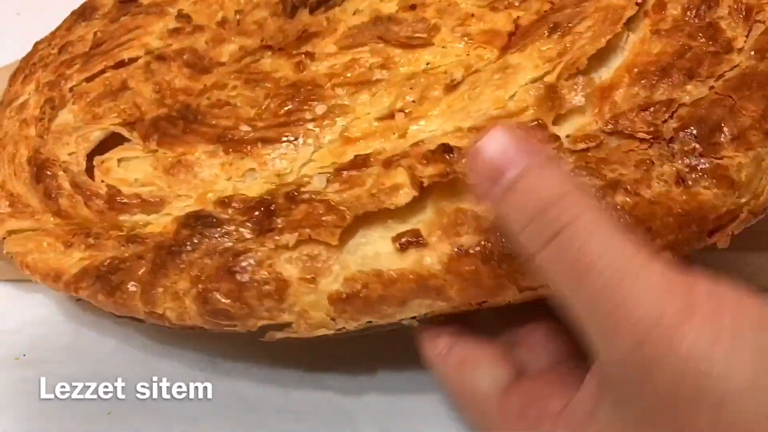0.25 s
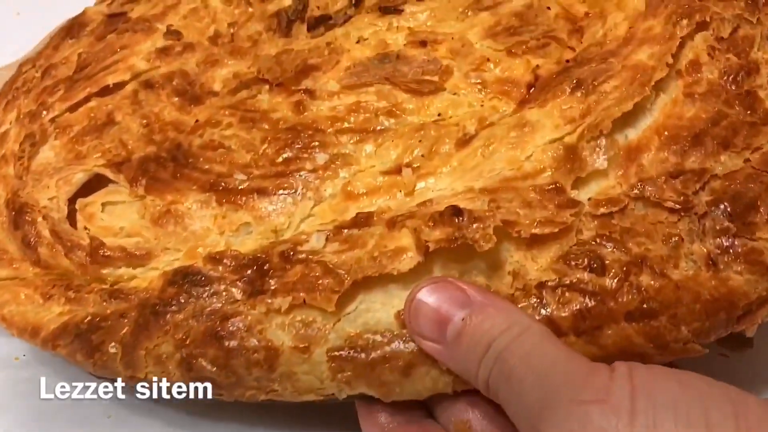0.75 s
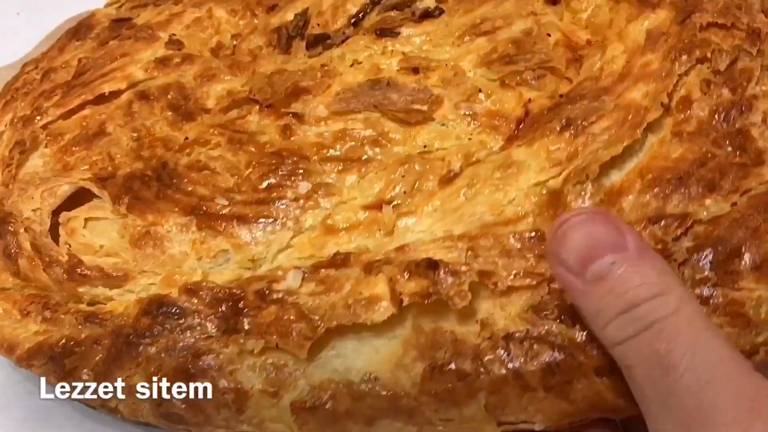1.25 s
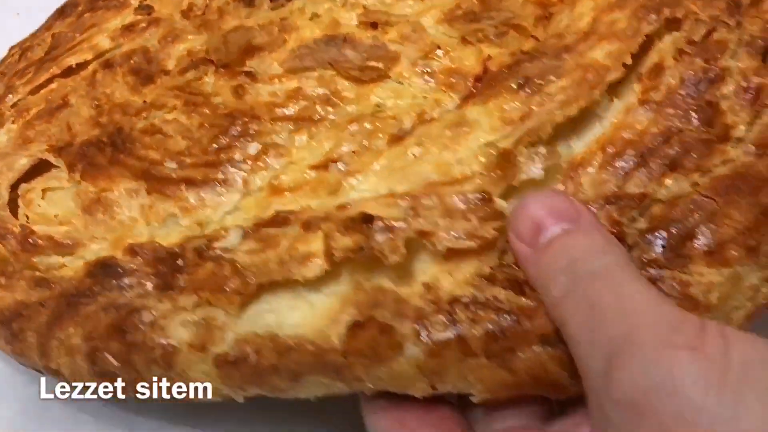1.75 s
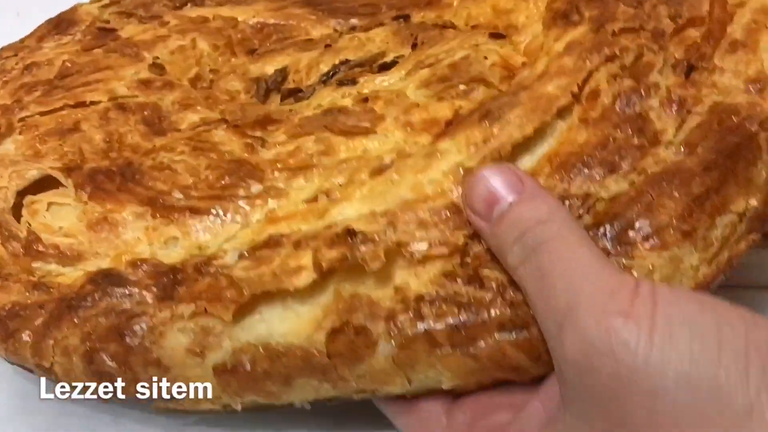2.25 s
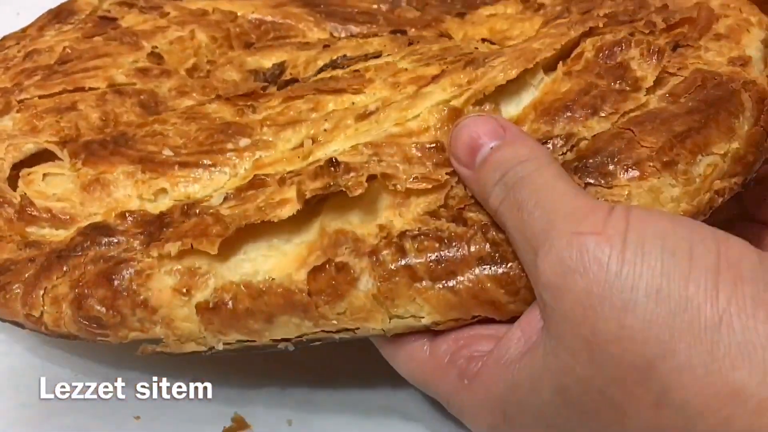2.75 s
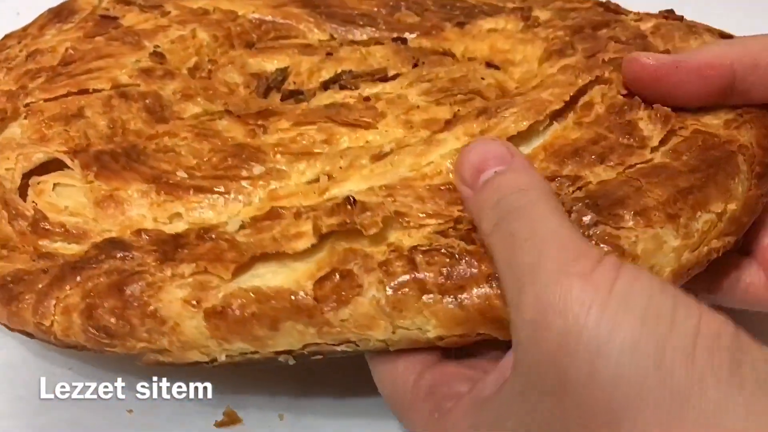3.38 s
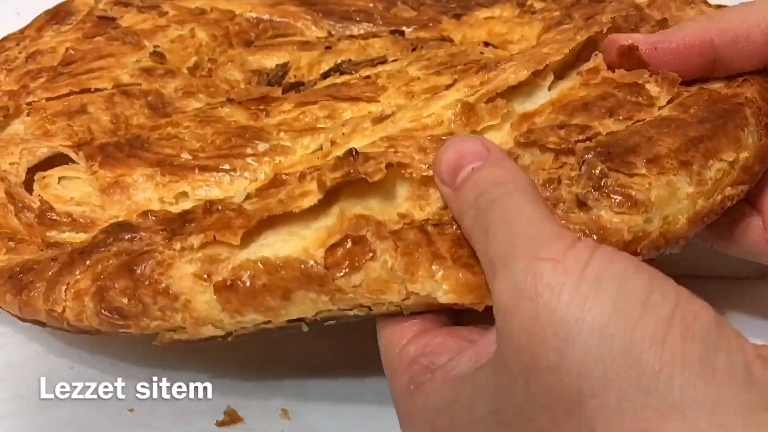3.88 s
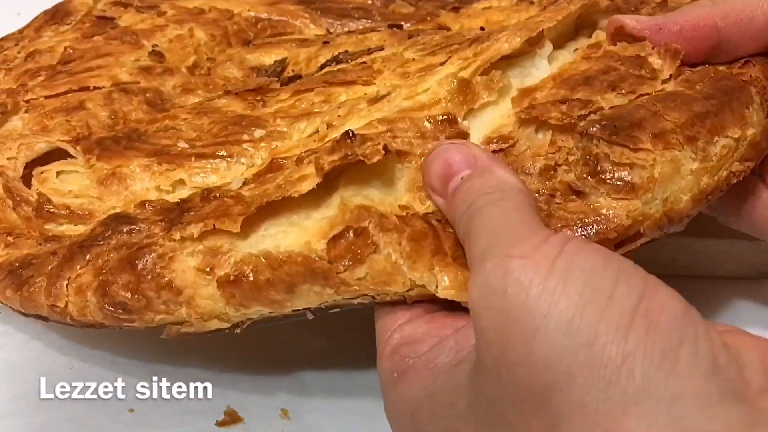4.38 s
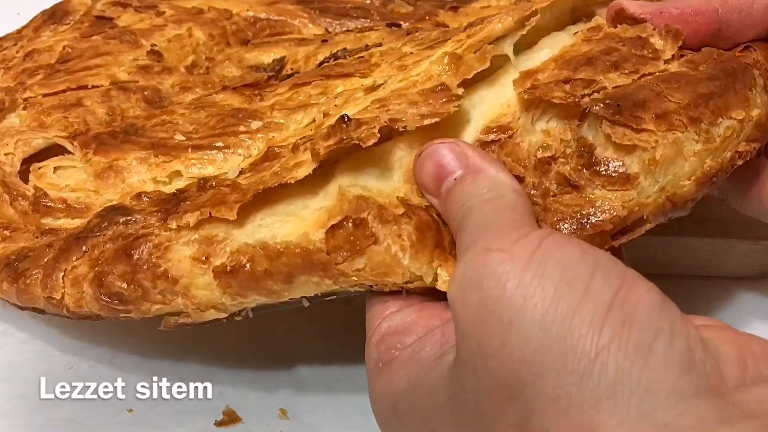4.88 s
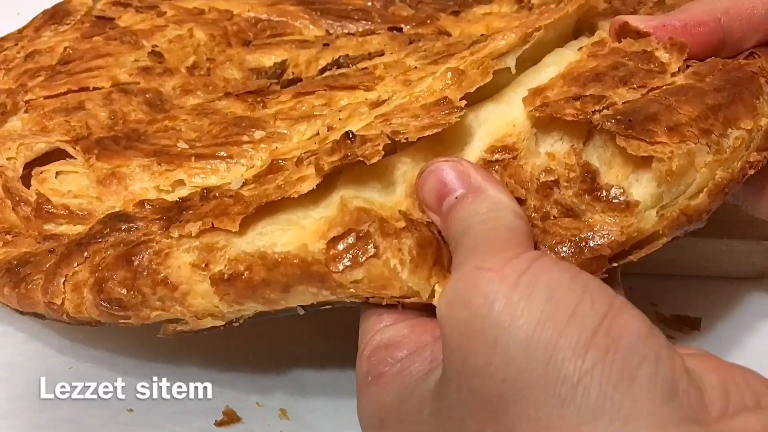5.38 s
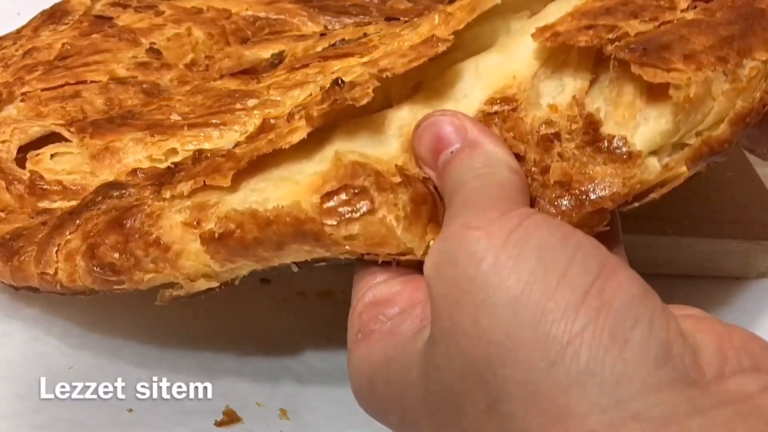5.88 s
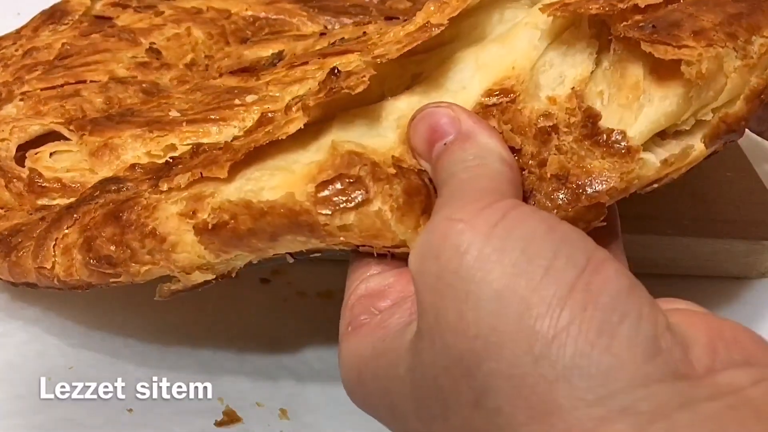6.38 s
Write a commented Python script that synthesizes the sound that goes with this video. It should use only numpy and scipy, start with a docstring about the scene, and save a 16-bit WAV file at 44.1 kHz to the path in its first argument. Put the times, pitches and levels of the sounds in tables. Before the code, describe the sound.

Brittle pastry crust being squeezed and pulled apart, heard close and dry with a faint room tail. Light rustling pushes and isolated snaps alternate, with faint low bumps as the loaf shifts; a quieter pause follows, then crackling gathers into a busy tearing stretch and eases into fine crumbly ticks. Behind everything, an appliance hums low and slightly wavering with gentle fan noise.

```python
"""In a kitchen, a hand presses a big flaky pastry and tears it bit by bit, close to the microphone.
Flakes of crust snap as short cascades of kicks that make a broad resonance ring and a dull layer knock.
Sliding skin is shaped noise, the fine crackle is many tiny pings, and the loaf bumps in soft uneven tones.
Behind it an appliance hums: steady tones with slightly wavering pitch over the soft noise of its fan."""
import sys
import numpy as np
from scipy import signal
from scipy.fft import rfft, irfft, next_fast_len
from scipy.io import wavfile
from scipy.ndimage import map_coordinates

SR = 44100
rng = np.random.default_rng(int(sys.argv[2]) if len(sys.argv) > 2 else 0)


def digitize_waveform(pressure):
    """Quantize a signal to 16-bit integers and store it at the path in sys.argv[1].

    Rows of a 2-D input are taken as channels; values are limited to [-1, 1].
    """
    field = np.atleast_2d(pressure).T
    bounded = np.clip(field, -1, 1)
    quanta = np.round(bounded * 32767).astype(np.int16)
    wavfile.write(sys.argv[1], SR, quanta)


N = 292383  # length in samples

# How the sound shifts back and forth between sliding hiss and tearing crackle, ending in crackle.
# Each row: time in seconds, share of the friction that is breaking crumbs (0 to 1).
TEARING = [(0, 0.4), (.45, 0.66), (.85, 0.47), (1.45, 0.94), (2.2, 0.11), (2.45, 0.56), (3.2, 0.3),
           (3.9, 0.72), (4.7, .8), (5.4, 0.9), (6.5, 1)]


def amp(db):
    """Turn decibels into a gain."""
    return 10 ** (np.asarray(db) / 20)


def unit(x):
    """Scale a sound to an rms (average strength) of 1."""
    return x / np.sqrt(np.mean(x ** 2) + 1e-20)


def along(points, hz):
    """Read a curve of (Hz, value) points, spaced by the logarithm of frequency."""
    point_hz, values = np.transpose(points)
    return np.interp(np.log(hz + 1), np.log(point_hz), values)


def wobble(rate):
    """Draw a smooth random curve with this many random points a second."""
    points = rng.standard_normal(int(N * rate / SR) + 4)
    return map_coordinates(points, [np.arange(N) * rate / SR])


def filtered(x, response):
    """Multiply each frequency of a sound by a gain that depends on it."""
    padded = next_fast_len(N + SR // 2)
    hz = np.fft.rfftfreq(padded, 1 / SR)
    return irfft(rfft(x, padded) * response(hz), padded)[:N]


def coloured(x, spectrum):
    """Shape a sound with (Hz, dB) points and bring it to rms 1."""
    return unit(filtered(x, lambda hz: amp(along(spectrum, hz))))


def causal(gain):
    """Build the response with this gain that starts at once and then dies away."""
    cepstrum = irfft(np.log(np.maximum(gain, 1e-6)))
    half = len(cepstrum) // 2
    # fold the half before time zero onto the half after it
    cepstrum[1:half] *= 2
    cepstrum[half + 1:] = 0
    return np.exp(rfft(cepstrum))


def add(track, s, sound):
    """Mix a sound into a track from time s in seconds."""
    start = max(round(s * SR), 0)
    part = track[start:start + len(sound)]
    part += sound[:len(part)]


def snaps(flakes, side_share, ring_db=-8, ring_s=0.0014, knock_s=0.0019, cascade_s=0.0027,
          sharp=0.31, modes_db=3.0, mode_spacing_hz=750, size=1024, count=5):
    """A flake breaks in one kick, with side cracks close by; the hollow layer under it knocks duller."""
    out = np.zeros(N)
    t, hz = np.arange(size) / SR, np.fft.rfftfreq(size, 1 / SR)
    lead, knock_octaves = .0006, .42  # seconds before the kick; width of the knock
    kick = unit(1. * (np.arange(size) == round(lead * SR)))
    to_4_ms = np.sqrt(.004 * SR / size)  # levels count as rms over 4 ms
    share = np.clip(side_share, 0, 1)

    def shiver(life):
        """A short burst of noise from the kick on, dying away over life seconds."""
        return unit(rng.standard_normal(size) * (t >= lead) * np.exp(-t / life))

    def ring(force, pitch, width):
        """A broad resonance, rippled by the piece's own modes."""
        distance = np.log2((hz + 1) / pitch) / max(width, .15)
        modes = map_coordinates(rng.standard_normal(size), [hz / mode_spacing_hz])
        gain = (1 + sharp * distance ** 2 / 2) ** -2 * amp(modes_db * modes)
        return unit(irfft(rfft(force) * causal(gain)))

    for s, crack_db, pitch, width, knock_db, knock_hz in flakes:
        delays = cascade_s * rng.random(count) ** 2  # squaring crowds them early
        places = np.round(delays * SR).astype(int)
        sides = np.bincount(places, rng.standard_normal(count), size)[:size]
        force = np.sqrt(1 - share) * kick + np.sqrt(share) * unit(sides)
        force = force + amp(ring_db) * shiver(ring_s)
        crack = amp(crack_db) * ring(force, pitch, width)
        knock = amp(knock_db) * ring(force + shiver(knock_s), knock_hz, knock_octaves)
        add(out, s - lead, to_4_ms * (crack + knock))
    return out


def small_flakes(friction, count=130, level_db=-45, follow=0.41, scatter_db=2.5, crowding=0.75,
                 pitch_hz=8200, pitch_octaves=0.37, width=0.45, knock_db=-13, knock_hz=2300):
    """Rows for the lesser flakes: the harder the hand tears, the more and the louder they break."""
    t = np.arange(N) / SR
    tear = np.interp(t, *np.transpose(TEARING))
    strain = np.cumsum(friction ** crowding * tear ** 2)
    # even steps of strain, each a little shifted, give the break times
    steps = (np.arange(count) + rng.random(count)) / count
    times = np.interp(steps, strain / strain[-1], t)
    strength, tone, hollow = rng.standard_normal((count, 3)).T
    force_db = 20 * np.log10(np.interp(times, t, unit(friction)))
    levels = level_db + follow * force_db + scatter_db * strength
    pitches = pitch_hz * 2 ** (pitch_octaves * tone)
    knock_pitches = knock_hz * 2 ** (pitch_octaves * hollow)
    return [(s, db, pitch, width, db + knock_db, knock_pitch)
            for s, db, pitch, knock_pitch in zip(times, levels, pitches, knock_pitches)]


def effort():
    """Friction and dull rub: each push swells and lets go, on top of a light steady grip."""
    # Pushes of the fingers on the crust.
    # Each row: peak time in seconds, friction in dB, dull rub in dB, rise in seconds, fall in seconds.
    pushes = [(.055, -50, -67.5, .25, .05), (.304, -49, -50.5, .09, .08), (.505, -39, -47.5, .18, .13),
              (.65, -52, -60, .06, .12), (.79, -53, -55, .1, .15), (.875, -48, -58, .15, .09),
              (1.04, -51, -61, .06, .24), (1.363, -48, -57, .04, .13), (1.575, -51, -58, .15, .17),
              (1.98, -53, -52.5, .55, .4), (2.23, -49, -51.5, .25, .3), (2.38, -40, -47.5, .08, .15),
              (2.63, -57, -62.5, .15, .45), (3.25, -55, -59.5, 1.1, .6), (3.411, -49, -71, .1, .2),
              (3.6, -49, -57.5, .4, .2), (3.914, -43, -60, .09, .14), (4.04, -46, -69.5, .05, .3),
              (4.309, -45, -70, .6, .4), (4.55, -46, -63, .3, .35), (4.745, -42, -69, .25, .2),
              (4.977, -50, -66, .07, .22), (5.49, -56, -72, .3, .9), (6.23, -56, -61, .55, .35)]
    grip_db, grip_rub_db = -72, -65.5  # the hand just holding the loaf
    push_fade_db = 20  # how far a push fades over its rise or fall time
    t = np.arange(N) / SR
    friction_power, drag_power = amp(grip_db) ** 2, amp(grip_rub_db) ** 2
    for s, db, rub_db, rise, fall in pushes:
        fade_db = push_fade_db * np.maximum((s - t) / rise, (t - s) / fall)
        friction_power = friction_power + amp(db - fade_db) ** 2
        drag_power = drag_power + amp(rub_db - fade_db) ** 2
    return np.sqrt(friction_power), np.sqrt(drag_power)


def handling(friction, drag, hiss_db=0.5, crackle_db=-1.0, stick_db=3.0):
    """Skin slides with a hiss and a dull rub; as the crust gives way the hiss turns into crackle."""
    # Colour of the hiss on the crust. Each row: frequency in Hz, relative level in dB per Hz.
    crust_colour = [(900, -33), (1800, 0), (3000, -1), (4300, -0.5), (6500, 2), (9000, 0), (12000, 0),
                    (16000, -3.5)]
    # Colour of the dull rub. Each row: frequency in Hz, relative level in dB per Hz.
    rub_colour = [(250, -28), (450, -8), (720, 0), (1200, -3), (2000, -4.5), (3000, -7.5), (5000, -13.5),
                  (9000, -46)]
    t = np.arange(N) / SR
    tear = np.clip(np.interp(t, *np.transpose(TEARING)), 0, .95)  # some hiss always stays
    grip = amp(stick_db * wobble(140))  # the skin sticks and slips
    hiss = amp(hiss_db) * coloured(grip * rng.standard_normal(N), crust_colour)
    rub = coloured(grip * rng.standard_normal(N), rub_colour)
    # sparse crumbs stand out more
    crackle = amp(crackle_db) * crumbs(friction) / unit(friction) ** (1 / 3)
    return friction * (np.sqrt(1 - tear) * hiss + np.sqrt(tear) * crackle) + drag * rub


def crumbs(friction, per_s=520, spread=0.48, cycles=0.78, size=160):
    """Tiny fractures, each a short ping at its own pitch, crowd as the force grows; rms 1."""
    pitch_hz, range_db = 6200, 24  # middle pitch; spread from weakest to strongest
    chance = per_s / SR * unit(friction) ** .5
    starts = np.flatnonzero(rng.random(N) < chance)
    luck, tone, life = rng.random((len(starts), 3)).T[:, :, None]
    hz = np.clip(pitch_hz * (tone / (1 - tone)) ** (spread / 2), 1800, 15000)
    t = np.arange(size) / SR
    age = t * hz / (cycles * (.5 + life))
    # low pings last longer, so they start softer
    strength = amp(range_db * luck ** 3) * np.sqrt(hz / pitch_hz)
    envelope = np.exp(-age) * (1 - np.exp(-4 * age))
    pings = strength * envelope * np.sin(2 * np.pi * hz * t)
    places = starts[:, None] + np.arange(size)
    return unit(np.bincount(places.ravel(), pings.ravel(), N)[:N])


def bumps(unsteady=1.17):
    """The loaf shifts: uneven low tones, a few cycles near 50 Hz to a longer murmur near 350 Hz."""
    # Soft bumps of the loaf, each swelling and fading.
    # Each row: middle time in seconds, peak level in dB, pitch in Hz, length in seconds.
    loaf_shifts = [(.44, -51.5, 135.5, .08), (.505, -51.5, 50, .09), (1.78, -48, 128, 0.18),
                   (1.95, -51.5, 45, 0.117), (2.473, -51, 321, 0.089), (2.911, -52.5, 350.7, 0.31)]
    out = np.zeros(N)
    for s, db, hz, length in loaf_shifts:
        t = np.arange(int(length * SR)) / SR
        phase = 2 * np.pi * hz * t + unsteady * wobble(hz / 4)[:len(t)]
        swell = np.sin(np.pi * t / length) ** 2
        add(out, s - length / 2, amp(db) * swell * np.sin(phase))
    return out


def kitchen(x, table_db=-17, table_s=0.0045, room_db=-17):
    """Sound bounces back once from the table, then as a faint room tail."""
    t60 = .3  # seconds for the tail to fall by 60 dB
    t = np.arange(SR // 3) / SR
    tail = rng.standard_normal(len(t)) * amp(-60 * t / t60) * (1 - np.exp(-t / 0.00081))
    answer = amp(room_db) * tail / np.linalg.norm(tail)
    answer[round(table_s * SR)] += amp(table_db)
    return x + signal.fftconvolve(x, answer)[:N]


def appliance(air_db=-54, tones_db=-2.0, drift=0.54):
    """Mains and motor tones over the fan's air; the pitch of higher tones wavers more, up to 400 Hz."""
    # Mains and motor tones. Each row: frequency in Hz, rms level in dB before tones_db is added.
    hum_tones = [(100, -50), (131, -72), (200, -56.5), (236.6, -50), (263.5, -62), (272.7, -60),
                 (300, -59.5), (400, -73), (473.2, -64.5), (609.7, -66.5), (946.3, -72.5), (1182.9, -67)]
    # Colour of fan and room. Each row: frequency in Hz, relative level in dB per Hz.
    air_colour = [(20, -33), (30, -28), (48, -7), (110, -5), (165, -3), (230, 4.5), (330, 1), (480, -8.5),
                  (1150, -10.5), (2200, -16.5), (4500, -35), (9000, -32), (15500, -28.5)]
    t = np.arange(N) / SR
    out = amp(air_db) * coloured(rng.standard_normal(N), air_colour)
    for hz, db in hum_tones:
        unrest = min(hz / 400, 1)
        phase = 2 * np.pi * (hz * t + rng.random()) + drift * unrest * wobble(4)
        out += np.sqrt(2) * amp(tones_db + db) * np.sin(phase)  # root 2 turns rms into peak
    return out


def scene():
    """The pastry in front with its echoes, the bumps and the appliance added without any."""
    # The big flakes that break.
    # Each row: time in seconds, crack level in dB over 4 ms, crack pitch in Hz,
    # band width in octaves (narrower than .15 counts as .15), knock level in dB over 4 ms, knock pitch in Hz.
    big_flakes = [(.206, -48.5, 8800, .2, -61.5, 1300), (.306, -35, 5500, 0.076, -33.5, 3090),
                  (.371, -39.5, 7500, .8, -49, 2400), (.408, -39, 7700, 0.35, -43.5, 2300),
                  (.425, -38, 7100, .6, -40, 2480), (.487, -32, 8000, 0.45, -34, 2070),
                  (.494, -47, 8100, .4, -51, 2680), (.5028, -19, 5830, 0.35, -35, 2500),
                  (.515, -30, 7900, 0.4, -51, 2500), (.520, -42, 7100, .9, -33, 1320),
                  (.578, -39, 9400, 0.21, -47, 1600), (.630, -36, 7400, 0.93, -38, 2430),
                  (.888, -38.5, 6500, 0.18, -46.5, 1690), (.999, -31, 7300, 0.18, -44, 1920),
                  (1.065, -36.5, 6000, 0.2, -37.5, 1930), (1.0695, -31.5, 6280, 0.116, -38, 2850),
                  (1.234, -44.5, 7400, 0.87, -69.5, 1600), (1.3237, -31.5, 9500, 0.46, -46, 2500),
                  (1.346, -37.5, 5960, 0.16, -43, 2620), (1.372, -31.5, 5950, 0.26, -47.5, 2200),
                  (1.407, -40, 6700, 0.4, -53, 2100), (1.5745, -42.5, 6250, 0.15, -47.5, 2600),
                  (1.768, -57.5, 6500, .5, -43, 1060), (1.869, -36, 4350, 0.18, -42.5, 1880),
                  (1.903, -39.5, 6000, 0.264, -38.5, 3220), (2.219, -36.5, 8000, .5, -39.5, 2200),
                  (2.3526, -28, 6000, 0.35, -32, 2480), (2.646, -41.5, 9000, 0.27, -62.5, 1800),
                  (3.041, -48.5, 6940, 0.27, -48, 2600), (3.224, -45.5, 9300, 0.5, -55, 1700),
                  (3.388, -34, 5640, 0.61, -50, 3000), (3.397, -39, 5360, 0.29, -58, 2300),
                  (3.417, -33.5, 5650, 0.3, -48, 2400), (3.443, -32.5, 6000, 0.46, -44, 2400),
                  (3.528, -29, 8700, 0.51, -65, 2800), (3.604, -28.5, 8000, 0.85, -50.5, 1700),
                  (3.6995, -39, 6860, 0.4, -53, 2300), (3.706, -40, 5500, .15, -42.5, 3000),
                  (3.919, -27, 7140, 0.63, -46, 2300), (3.964, -39, 7600, .6, -58, 2100),
                  (3.990, -37, 7800, 0.52, -47, 1800), (4.014, -36.5, 8200, .7, -53, 1800),
                  (4.0434, -32, 6100, 0.41, -41.5, 2200), (4.0846, -33, 7300, 0.6, -47, 2700),
                  (4.186, -39, 7800, 0.53, -49, 2000), (4.1896, -27, 7660, 0.29, -49, 2000),
                  (4.241, -33.5, 8200, 0.4, -59, 2200), (4.2636, -34, 7800, .55, -54, 3200),
                  (4.2844, -31.5, 8600, 0.286, -59, 2600), (4.3057, -24, 8300, 0.2, -56, 2700),
                  (4.322, -27, 6800, .37, -42, 2500), (4.400, -32.5, 8200, 0.27, -45, 2700),
                  (4.441, -35.5, 9700, 0.49, -43, 3000), (4.4643, -26.5, 7200, .4, -38, 2520),
                  (4.493, -43, 6500, 0.57, -38.5, 3400), (4.528, -26.5, 7600, 0.29, -28.5, 3060),
                  (4.557, -41, 7100, .3, -39, 2400), (4.570, -33, 9100, 0.72, -35, 2640),
                  (4.616, -34, 7800, 0.56, -41.5, 2300), (4.649, -35.5, 7500, .35, -41.5, 2000),
                  (4.682, -36, 8100, 0.17, -57, 2100), (4.693, -34.5, 8700, 0.5, -42, 2700),
                  (4.7134, -34, 5800, .2, -43, 2400), (4.727, -41, 7500, .4, -40, 2210),
                  (4.756, -24, 6060, 0.41, -29.5, 3500), (4.790, -30, 7160, 0.75, -31, 3180),
                  (4.912, -35.5, 7300, 0.136, -39, 3130), (4.956, -36.5, 7400, 0.57, -44.5, 3230),
                  (4.980, -35, 6730, 0.18, -37.5, 2840), (5.1254, -40, 7240, 0.62, -53, 1800),
                  (5.192, -40.5, 7460, 0.21, -45, 2730), (5.371, -31.5, 9400, 0.474, -55, 2000),
                  (5.4867, -34.5, 9000, 1, -48, 2090), (5.582, -41, 10600, 0.32, -54, 2000),
                  (5.682, -44.5, 9000, 0.65, -52, 2100), (5.875, -32.5, 5760, 0.35, -39.5, 3400),
                  (6.0364, -41, 6740, 0.19, -53, 3000), (6.1996, -37, 8000, 0.97, -39, 2270),
                  (6.277, -33, 4880, 0.32, -41, 3240)]
    friction, drag = effort()
    low = bumps() + appliance()
    flakes = snaps(big_flakes, side_share=0.21) + snaps(small_flakes(friction), side_share=0.34)
    return (kitchen(flakes + handling(friction, drag)) + low)[None]


def record(dry):
    """The microphone colours the treble; nothing is kept above the band limit."""
    # Colour of the microphone. Each row: frequency in Hz, gain in dB.
    treble_colour = [(3500, 0), (4400, 2), (5000, -1), (5500, 1), (9600, 1), (10400, -3), (11600, 0),
                     (15500, 0)]
    top_hz = 15950

    def response(hz):
        """Gain of the microphone at each frequency."""
        return amp(along(treble_colour, hz)) * (hz < top_hz)

    return np.array([filtered(x, response) for x in dry])


dry = scene()
out = record(dry)
digitize_waveform(out)
```